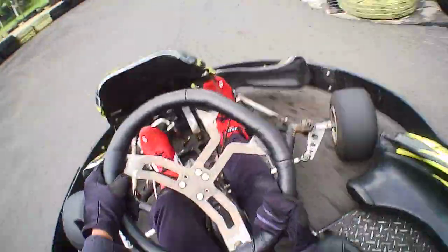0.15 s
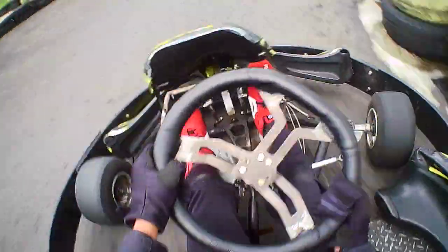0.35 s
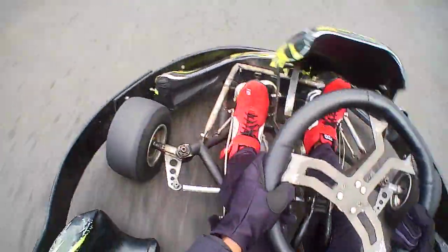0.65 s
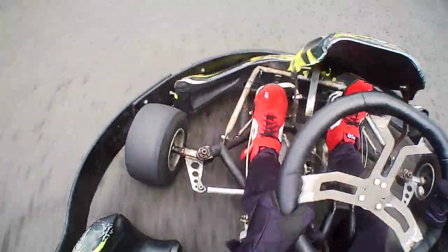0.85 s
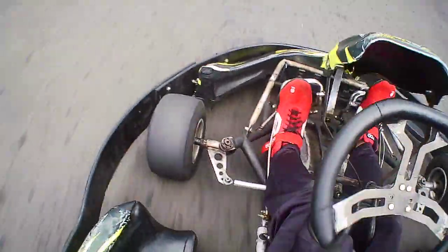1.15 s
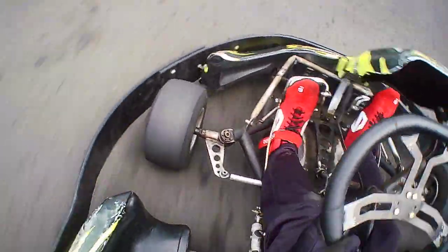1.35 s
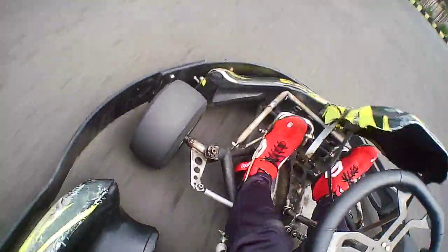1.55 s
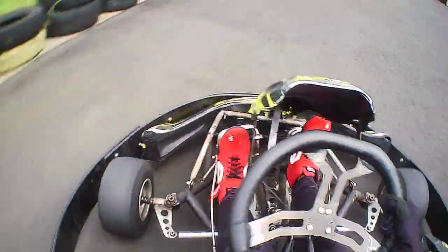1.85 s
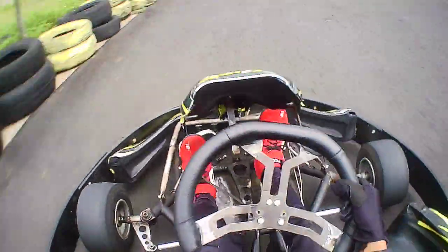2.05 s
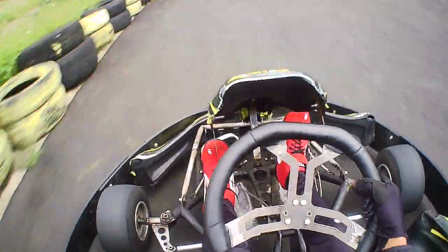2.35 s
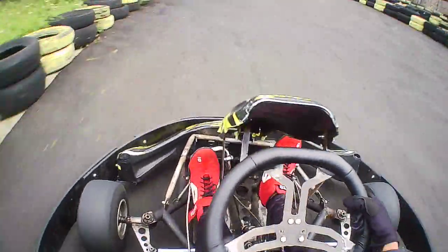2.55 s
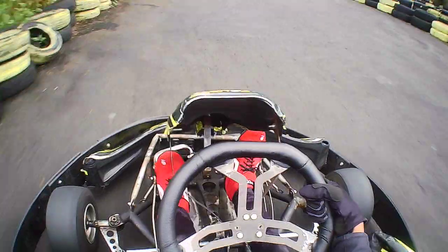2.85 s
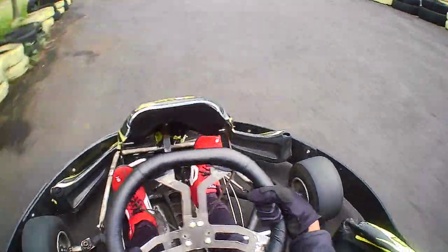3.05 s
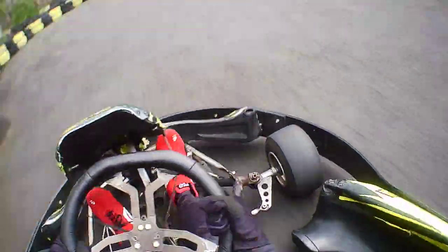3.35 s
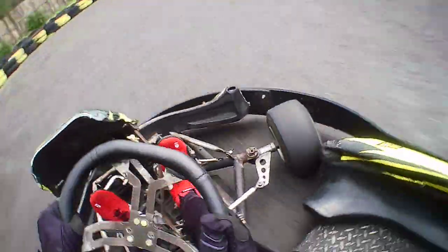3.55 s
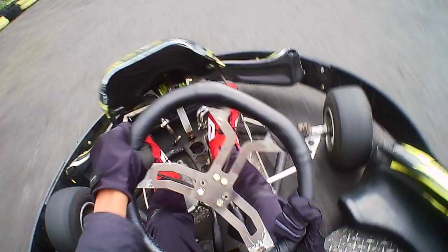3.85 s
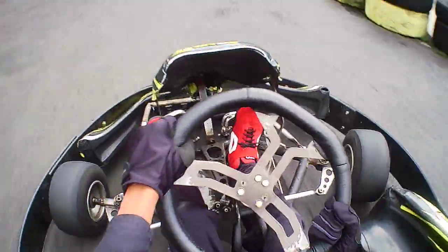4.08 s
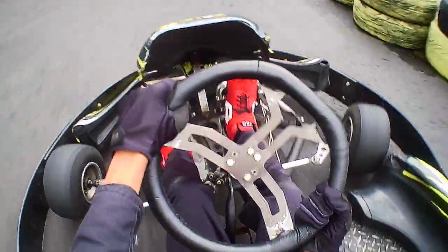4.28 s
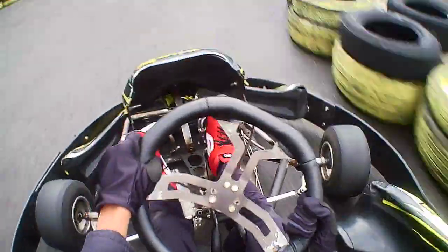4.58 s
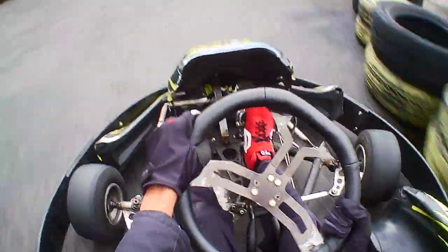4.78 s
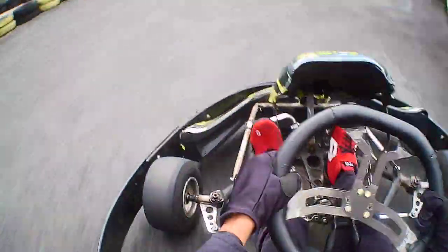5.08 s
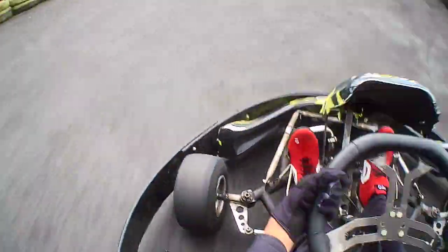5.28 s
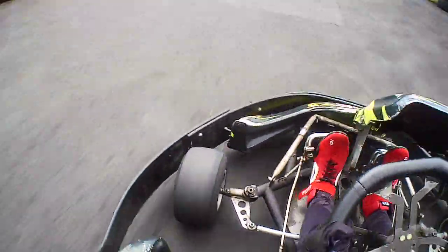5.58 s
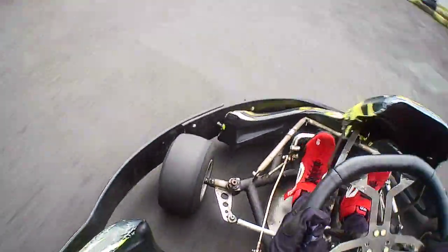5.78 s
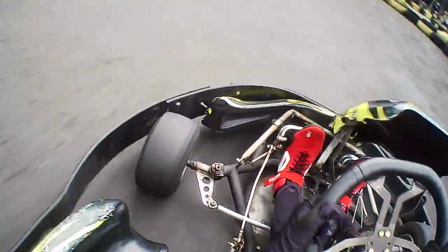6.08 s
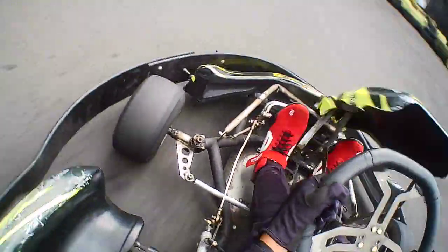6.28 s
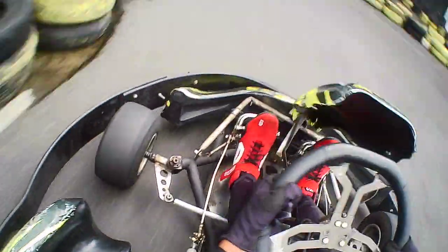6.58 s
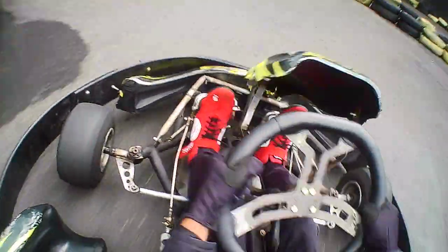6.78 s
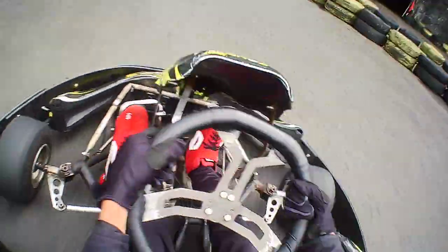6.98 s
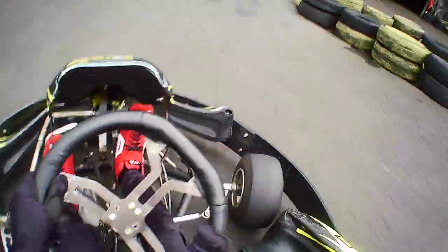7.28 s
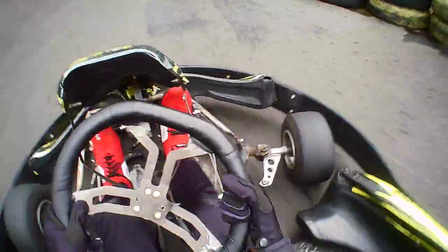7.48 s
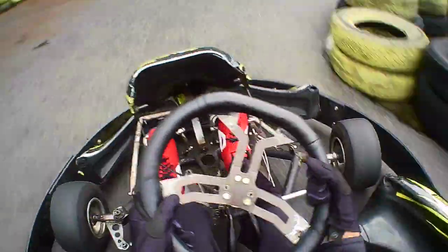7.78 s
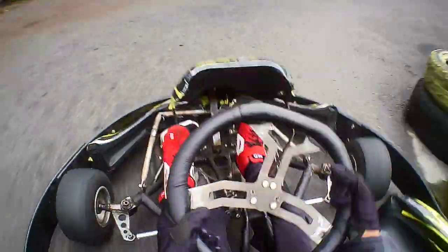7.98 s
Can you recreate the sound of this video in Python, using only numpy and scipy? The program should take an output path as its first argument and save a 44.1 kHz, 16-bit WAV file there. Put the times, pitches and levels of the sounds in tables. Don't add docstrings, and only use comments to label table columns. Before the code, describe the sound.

Heard from the driver's helmet on an outdoor track: rapid rough putter of a single-cylinder engine, knocking and rattling, easing and pulling again in small swells. Very deep irregular thumps and wobbling rumble dominate below, thickest around the middle and late on. Sharp dry ticks from something loose scatter throughout; the sound is muffled, boxy and overloaded, with dull treble.

```python
import sys
import numpy as np
from scipy import signal
from scipy.fft import rfft, irfft
from scipy.io import wavfile
from scipy.ndimage import uniform_filter1d

SR = 44100
rng = np.random.default_rng(int(sys.argv[2]) if len(sys.argv) > 2 else 0)


def file_out(sig):
    cols = np.atleast_2d(sig).T
    lim = np.clip(cols, -1, 1)
    pcm = np.round(lim * 32767).astype(np.int16)
    wavfile.write(sys.argv[1], SR, pcm)


def ratio(d):
    e = np.asarray(d, float) / 20
    return 10 ** e


N = 358533


def in_time(rows):
    s, *columns = np.transpose(rows)
    return [np.interp(np.arange(N) / SR, s, column) for column in columns]


def at_times(curve, s):
    return curve[(s * SR).astype(int)]


def rms_one(x):
    return x / np.sqrt(np.mean(x ** 2) + 1e-20)


def cut(x, hz, kind, order=2):
    return signal.sosfilt(signal.butter(order, hz, kind, fs=SR, output="sos"), x)


def clicks(seconds, heights):
    out = np.full(N, 1e-18)
    index = np.round(np.asarray(seconds) * SR).astype(int)
    np.add.at(out, np.minimum(index, N - 1), heights)
    return out


def ring(x, hz, t60):
    r, w = ratio(-60 / (t60 * SR)), 2 * np.pi * hz / SR
    return signal.lfilter([0, np.sin(w)], [1, -2 * r * np.cos(w), r * r], x)


def resonate(x, peaks):
    out = 0
    for k, (hz, width, db) in enumerate(peaks):
        r, w = np.exp(-np.pi * width / SR), 2 * np.pi * hz / SR
        b = (1 - r * r) / 2 * np.array([1, 0, -1])
        out = out + (-1) ** k * ratio(db) * signal.lfilter(b, [1, -2 * r * np.cos(w), r * r], x)
    return out


def evened(x):
    turn = .033 * SR
    power = uniform_filter1d(uniform_filter1d(x ** 2, size=int(turn)), size=int(turn / 2))
    return x * (power / power.mean() + 1e-6) ** (-.7 / 2)


def gritty_bursts(turns, bursts, shared, steady_db, uneven_db, jitter, grain_db):
    gate = ratio(steady_db)
    for position, rise, fall, db in bursts:
        number = np.floor(turns - position + .5).astype(int) + 1
        luck = .7 * shared + .7 * rng.standard_normal(shared.shape)
        lag = turns - position + 1 - number - jitter * luck[number, 0]
        shape = np.where(lag < 0, np.exp(-(lag / rise) ** 2), np.exp(-np.maximum(lag, 0) / fall))
        gate = gate + shape * ratio(db + uneven_db * luck[number, 1])
    grains = ratio(grain_db * np.minimum(rng.exponential(1, N), 6))
    return gate * grains * rng.standard_normal(N)


# time in seconds, speed in firings per second.
FIRING_RATE = [(0.0, 31.1), (0.66, 30.28), (1.09, 27.98), (1.61, 27.48), (2.0, 31.52), (2.22, 30.27),
               (2.98, 33.05), (3.16, 34.81), (3.67, 31.15), (4.56, 30.48), (4.68, 31.52), (5.39, 27.73),
               (5.7, 31.33), (6.18, 29.89), (6.4, 31.68), (7.0, 28.91), (7.47, 31.08), (8.13, 30.36)]


def crank():
    return .48 + np.cumsum(in_time(FIRING_RATE)[0]) / SR


def whole_turns(turns):
    return np.flatnonzero(np.diff(np.floor(np.maximum.accumulate(turns)))) / SR


# time in seconds, push in full scale, lag in axle turns.
AXLE_LIFT = [(0.0, 0.29, 0.46), (0.4, 0.52, 0.59), (1.0, 0.12, 0.84), (1.5, 0.39, 0.69), (1.9, 0.27, 0.64),
             (2.3, 0.18, 0.62), (2.7, 0.34, 0.72), (3.1, 0.19, 0.74), (3.6, 0.4, 0.7), (4.2, 0.28, 0.74),
             (4.8, 0.36, 0.66), (5.2, 0.12, 1.02), (5.6, 0.26, 0.51), (6.0, 0.27, 0.61), (6.5, 0.27, 0.71),
             (7.1, 0.39, 0.66), (7.6, 0.46, 0.74), (8.13, 0.15, 0.64)]


def axle_turns():
    push, lag = in_time(AXLE_LIFT)
    s = whole_turns(crank() / 3.016 - lag)
    return s, at_times(push, s)


# time in seconds, push in full scale (up is positive), share caught again on the
BUMPS = [(0.211, -0.75, -0.06, -0.47), (0.491, 0.39, -0.1, 0.07), (0.559, -0.19, -1.0, 0.17),
         (0.641, -0.23, -0.06, 0.1), (1.177, 0.16, -1.0, 0.31), (1.708, 0.58, 0.45, 0.24),
         (2.016, -0.48, 0.43, 0.51), (2.508, 0.51, 0.7, 0.66), (2.612, -0.19, 0.53, 0.48),
         (3.313, -0.56, 0.4, 0.34), (3.502, -1.1, 0.3, 0.24), (3.673, -1.35, 0.5, 0.74),
         (3.892, 0.45, 0.28, 0.01), (4.062, -0.95, 0.35, 0.68), (4.11, 0.36, 0.98, -0.16),
         (4.197, 0.9, 0.15, 0.49), (4.475, -0.19, 0.82, 0.32), (4.863, -0.86, 0.55, 0.04),
         (4.935, 0.48, -0.99, -0.75), (5.864, -0.55, 0.22, 0.42), (5.948, 0.13, 0.38, -0.39),
         (6.072, -0.59, 0.18, 0.37), (6.366, -0.56, 0.11, 0.46), (6.453, -0.89, 0.22, 0.42),
         (6.658, -0.8, 0.57, 0.49), (6.953, -0.55, 0.9, 0.52), (7.057, -0.55, 1.4, 0.58),
         (7.151, -0.48, 0.3, -0.41), (7.888, 0.39, 1.5, 0.65), (7.998, 0.67, 0.46, 0.76)]
# time in seconds, push in full scale.
SEAMS = [(1.261, -0.32), (1.817, 0.16), (2.155, 0.25), (2.886, 0.3), (3.17, 0.36), (4.14, -0.42),
         (4.255, 0.15), (4.91, -0.2), (4.958, -0.51), (5.193, 0.27), (5.688, 0.11), (6.271, 0.5),
         (6.787, 0.22), (7.016, 0.32), (7.133, 0.27), (7.497, 0.13)]


def jolts():
    rebound_s = .0218
    s, push, caught, _ = np.transpose(BUMPS)
    return np.vstack([np.c_[s, push], np.c_[s + rebound_s, -push * caught], SEAMS])


# time in seconds, load in dB, shade in dB.
LOAD = [(0, -0.5, 1.5), (.68, -2, 2.5), (1.1, -3, 0.5), (1.4, -4.5, -1), (1.9, -2, 1.5), (3.11, -0.5, 2.5),
        (3.22, -2, 2.5), (3.62, -4, 1.5), (3.92, -10.5, 0.5), (3.96, 0.5, 1), (4.3, -1.5, 2.5),
        (4.8, 0.5, 2), (5.37, -3, -0.5), (5.82, -1.5, -0.5), (6.0, -8.5, -0.5), (6.3, -0.5, -0.5),
        (6.97, -3.5, 1), (7.4, -0.5, 3)]
# frequency in Hz, density in dB per Hz.
ROAD_COLOUR = [(45, -50), (70, -34.5), (110, -21), (180, -21.5), (300, -20.5), (700, -34.5), (1000, -23.5),
               (2500, -42)]


def road():
    hz = np.maximum(np.fft.rfftfreq(N, 1 / SR), 1)
    colour_hz, colour_db = np.transpose(ROAD_COLOUR)
    colour = ratio(np.interp(np.log(hz), np.log(colour_hz), colour_db))
    lumps = rms_one(cut(rng.standard_normal(N), 18.2, "low"))
    noise = irfft(rfft(rng.standard_normal(N) * ratio(3.08 * lumps)) * colour, N)
    noise = cut(noise, 5500, "low")
    s, push = jolts().T
    shaken = signal.lfilter([1], [1, -np.exp(-1 / (.08 * SR))], clicks(s, np.abs(push)))
    level_db = -37.5 + .35 * in_time(LOAD)[0] + 3 * shaken
    return ratio(level_db) * rms_one(noise)


def thuds():
    s, push = jolts().T
    shake = signal.lfilter([1], [1, -ratio(-60 / (.12 * SR))], clicks(s, np.abs(push) ** 3))
    rumble = cut(cut(rng.standard_normal(N), 70, "high"), 170, "low", order=4)
    return ratio(-24) * cut(shake, 60, "low") * rms_one(rumble)


def mount(pushes, hz, t60, soft_hz):
    return cut(ring(clicks(*np.transpose(pushes)), hz, t60), soft_hz, "low")


# time in seconds, push in full scale, heave in full
LESSER_PUSHES = [(0.031, -0.08, -0.26), (0.222, -0.25, 0.09), (0.324, -0.12, -0.29), (0.67, 0.02, 0.21),
                 (0.751, -0.05, 0.18), (0.937, -0.06, 0.31), (1.033, -0.09, 0.26), (1.411, 0.1, 0.16),
                 (1.905, 0.05, 0.17), (1.984, -0.09, -0.2), (2.098, 0.11, -0.24), (2.145, 0.01, 0.26),
                 (2.512, 0.02, -0.26), (2.543, -0.21, 0.06), (2.586, 0.07, -0.29), (2.699, -0.22, -0.06),
                 (2.941, -0.06, -0.19), (3.016, 0.13, 0.22), (3.16, 0.04, 0.29), (3.215, 0.06, 0.19),
                 (3.379, 0.21, 0.14), (3.471, -0.01, -0.32), (3.59, 0.11, -0.18), (3.661, -0.17, -0.27),
                 (3.761, -0.14, 0.11), (3.865, -0.02, 0.34), (3.942, 0.06, 0.23), (4.227, -0.22, 0.15),
                 (4.257, 0.01, -0.19), (4.354, 0.01, 0.23), (4.444, -0.01, -0.35), (4.556, -0.07, -0.35),
                 (4.683, -0.07, -0.21), (4.747, 0.05, 0.22), (4.803, 0.06, -0.21), (4.898, 0.11, 0.39),
                 (4.928, 0.09, 0.16), (5.182, 0.06, 0.29), (5.266, -0.09, -0.23), (5.408, -0.1, -0.22),
                 (5.585, 0.14, -0.09), (5.686, -0.02, 0.23), (5.746, -0.09, -0.18), (6.045, 0.03, -0.2),
                 (6.183, -0.04, 0.18), (6.253, -0.14, 0.34), (6.283, 0.22, -0.05), (6.409, -0.08, 0.16),
                 (6.499, -0.21, 0.13), (6.631, -0.04, -0.27), (6.704, -0.27, 0.26), (6.845, -0.12, 0.3),
                 (7.048, -0.12, -0.27), (7.18, 0.18, 0.01), (7.368, -0.19, 0.04), (7.567, -0.14, 0.13),
                 (7.687, -0.23, -0.16), (7.842, -0.08, -0.21), (7.906, 0.11, 0.14), (7.981, -0.18, -0.26)]
# time in seconds, push in full scale.
LIGHT_PUSHES = [(0.006, -0.21), (0.073, -0.13), (0.164, -0.12), (0.195, 0.26), (0.22, -0.12), (0.383, 0.09),
                (0.866, -0.1), (1.339, 0.16), (1.599, 0.13), (1.686, -0.11), (1.743, -0.13), (2.041, -0.14),
                (2.619, 0.13), (2.679, 0.12), (2.786, 0.1), (2.897, 0.15), (2.93, 0.11), (2.98, -0.14),
                (3.301, -0.12), (3.337, -0.19), (3.413, 0.11), (3.528, 0.16), (3.545, 0.24), (3.574, -0.18),
                (3.685, -0.45), (3.721, -0.14), (3.802, 0.09), (3.892, -0.15), (3.926, -0.13), (4.049, -0.19),
                (4.094, 0.11), (4.185, -0.23), (4.378, 0.11), (4.501, -0.12), (4.892, 0.15), (4.919, -0.11),
                (5.089, 0.13), (5.854, -0.17), (5.89, -0.16), (6.279, 0.11), (6.329, -0.16), (6.47, 0.1),
                (6.534, 0.12), (6.577, 0.11), (6.69, 0.12), (6.803, 0.11), (6.864, 0.14), (6.941, -0.18),
                (6.975, -0.12), (7.057, -0.14), (7.079, 0.14), (7.12, 0.12), (7.358, -0.13), (7.384, 0.16),
                (7.539, 0.09), (7.653, -0.09), (7.916, -0.15), (7.953, -0.15), (8.001, 0.23), (8.026, -0.18)]


def shaking():
    ring_hz, ring_t60 = 42, .3
    s = np.arange(N) / SR
    left_over = -.25 * np.cos(2 * np.pi * ring_hz * s) * ratio(-60 * s / ring_t60)
    wallow = ratio(-33) * rms_one(cut(rng.standard_normal(N), 42, "low", order=4))
    turned, lift = axle_turns()
    bumps, lesser = np.array(BUMPS), np.array(LESSER_PUSHES)
    heaves = np.vstack([np.c_[turned, lift], bumps[:, [0, 3]], lesser[:, [0, 2]]])
    kicks = lift * (.2 + .02 * rng.standard_normal(len(lift)))
    rings = np.vstack([jolts(), np.c_[turned + .012, kicks], lesser[:, :2], LIGHT_PUSHES])
    swing = mount(heaves, 10, .4, 40) + mount(rings, ring_hz, ring_t60, 70) + left_over + wallow
    return swing + .6 * np.maximum(swing, 0) ** 3


# time in seconds, peak in dB.
TICKS = [(0.0757, -27.5), (0.7233, -26), (1.182, -15.5), (1.3545, -25), (1.569, -20), (1.6157, -34),
         (1.706, -19.5), (1.7886, -23.5), (1.8253, -38), (2.008, -22), (2.4665, -25), (2.509, -25),
         (2.604, -13), (2.8838, -22), (3.1193, -28.5), (3.3214, -12.5), (3.4386, -23.5), (3.6734, -23.5),
         (3.708, -42.5), (3.7815, -23.5), (4.0524, -21), (4.1704, -18), (4.2125, -20), (4.344, -22.5),
         (4.4104, -34), (4.8904, -23.5), (4.9556, -17.5), (5.0629, -24), (5.23, -27), (5.272, -20.5),
         (5.3978, -26), (5.6181, -31), (6.0595, -25), (6.123, -30), (6.354, -24), (6.4504, -20),
         (6.568, -23), (6.659, -12.5), (6.8564, -18), (7.0665, -22.5), (7.0928, -34), (7.1274, -27),
         (7.1852, -19.5), (7.2709, -18), (7.7532, -23.5), (7.8565, -24), (7.9023, -27), (7.966, -23),
         (0.0094, -27), (0.1138, -25), (0.5607, -24.5), (0.931, -28.5), (1.255, -25.5), (1.681, -26),
               (1.8966, -23), (2.1215, -27), (2.5427, -25.5), (2.5977, -27.5), (4.23, -27), (4.574, -29.5),
               (4.8417, -24), (6.6485, -25), (6.8446, -26.5), (6.928, -28), (7.0942, -29), (7.2824, -33.5)]
# frequency in Hz, level in dB, t60 in seconds.
TICK_MODES = [(3450, 5, 0.0065), (3637, -0.5, 0.0087), (3940, 0, 0.013), (4254, -2, 0.017)]
# frequency in Hz, level in dB, t60 in seconds.
TICK_BRIGHT = [(5300, 9.5, 0.003), (6570, -8, 0.017), (8500, -9.5, 0.033)]
# delay in seconds, level in dB.
BOUNCES = [
    (0.0, 0.5),
    (.0034, -1),
    (.0068, -6.5),
    (.011, -27),
]


def loose_part():
    turned = axle_turns()[0]
    chance = rng.standard_normal((len(turned), 2)).clip(-2, 2)
    faint_s = np.abs(turned + .015 * chance[:, 0])
    faint_db = -40 + at_times(in_time(LOAD)[1], turned) + 3 * chance[:, 1]
    s, peak_db = np.vstack([TICKS, np.c_[faint_s, faint_db]]).T
    bright_db = -13 + 2 * rng.standard_normal(len(s))
    out = 0
    for modes, share_db in ((TICK_MODES, -7), (TICK_BRIGHT, bright_db)):
        for hz, db, t60 in modes:
            luck = rng.standard_normal((len(s), len(BOUNCES), 2))
            blows = 0
            for k, (lag, bounce_db) in enumerate(BOUNCES):
                hit_s = s + lag + .00026 * np.abs(luck[:, k, 0])
                hit_db = peak_db + share_db + db + bounce_db + 2 * luck[:, k, 1]
                blows = blows + clicks(hit_s, ratio(hit_db))
            out = out + ring(blows, hz, t60)
    return out


# frequency in Hz, width in Hz, level in dB.
INTAKE = [(650, 350, -3.5), (1073, 160, -2.5)]
# crank position in turns, rise in turns, fall in turns, level in dB.
INTAKE_BURSTS = [
    (.73, .04, .05, 0),
    (.03, .04, .06, -8),
]


def intake():
    turns = crank()
    unshared = np.zeros((int(turns[-1]) + 3, 2))
    gulps = gritty_bursts(turns, INTAKE_BURSTS, unshared, steady_db=-12, uneven_db=1.5, jitter=.02, grain_db=1)
    rush = resonate(resonate(gulps, INTAKE), INTAKE)
    level_db = -42 + 2 * (in_time(FIRING_RATE)[0] - 30.63) + .78 * in_time(LOAD)[0]
    return ratio(level_db) * rms_one(rush)


# crank position in turns, level in dB.
VALVE = [
    (.65, 0),
    (.94, -3),
]


def valve(turns):
    luck = rng.standard_normal((int(turns[-1]) + 3, 2))
    out = 0
    for position, db in VALVE:
        s = whole_turns(turns - position)
        mine = luck[np.floor(at_times(turns, s)).astype(int)]
        wander_s = .025 * mine[:, 0] / 30
        out = out + clicks(np.abs(s + wander_s), ratio(db + mine[:, 1]))
    return out


def with_speed(x, peaks):
    clock = np.cumsum((in_time(FIRING_RATE)[0] / 30.8) ** .9)
    even = np.arange(int(clock[-1]) + 1)
    return np.interp(clock, even, resonate(np.interp(even, clock, x), peaks))


# crank position in turns, rise in turns, fall in turns, level in dB.
PIPE_BURSTS = [
    (0.67, 0.035, 0.12, -2.5),
    (0.94, 0.035, 0.06, -7),
    (0.25, 0.3, 0.3, -13),
]


def exhaust_puffs(turns, shared):
    return rms_one(gritty_bursts(turns, PIPE_BURSTS, shared, steady_db=-14, uneven_db=1,
                                 jitter=.015, grain_db=1.5))


# frequency in Hz, width in Hz, level in dB.
PIPE = [(334, 45, -4), (431.7, 42, 4), (530.4, 58, 5), (616.3, 98, 1.5)]
# frequency in Hz, width in Hz, level in dB.
SILENCER = [(422, 38, -2.5), (537, 52, 1.5), (608, 85, -2)]


def exhaust(puffs, turns, shared, load_db):
    in_pipe = puffs + ratio(3) * rms_one(valve(turns))
    chambers = exhaust_puffs(turns, shared)
    pipe = with_speed(in_pipe, PIPE) + resonate(chambers, SILENCER)
    pipe = cut(cut(pipe, 360, "high", order=5), 650, "low", order=5)
    return ratio(-33 + .52 * load_db) * rms_one(pipe)


# frequency in Hz, width in Hz, level in dB.
BLOCK = [(790, 350, -16), (970, 640, -21), (1206, 58, .5), (1353, 126, -4), (1422, 175, -5.5),
         (1896, 172, -11), (2120, 220, -16)]
# time in seconds, main ring in dB, highest clatter in dB.
FACING = [(0, 1, 3.5), (.8, 0.5, -2.5), (1.05, -2, 2.5), (1.4, -1, 8), (2.2, 2, 0.5), (2.6, -3.5, -4),
          (3.15, 3.5, 3), (3.3, -3, 3), (3.7, -1.5, 8), (3.95, 0, 3.5), (4.8, 1.5, 1.5), (5.0, -3.5, -2),
          (5.4, -1, -0.5), (6.0, -3.5, 0), (6.8, 1, 0.5), (7.5, -0.5, 1), (7.75, -2, -2), (8.13, 0, -4)]


def block(knock, load_db):
    main_ring = ratio(in_time(FACING)[0]) * evened(resonate(knock, BLOCK[2:3]))
    below = evened(resonate(knock, BLOCK[:2]))
    above = evened(resonate(knock, BLOCK[3:5])) + evened(resonate(knock, BLOCK[5:]))
    body = cut(cut(main_ring + below - above, 690, "high"), 3000, "low")
    return ratio(-27.5 + load_db) * rms_one(body)


# frequency in Hz, width in
# Hz, level in dB.
SHELL = [(2780, 200, -2), (3550, 500, -5), (4220, 150, 0), (4800, 350, -7), (5450, 300, -6),
         (5850, 300, -8), (6850, 450, -9), (7500, 500, -16), (7980, 80, -8)]


def shell(clatter, shell_db, shade_db):
    bright = cut(cut(evened(resonate(clatter, SHELL)), 1100, "high"), 7600, "low")
    lower = signal.sosfiltfilt(signal.butter(2, 6000, fs=SR, output="sos"), bright)
    top_db = -5 + in_time(FACING)[1] + 3.5 * shade_db
    bright = lower + ratio(top_db) * (bright - lower)
    return ratio(shell_db) * rms_one(bright)


# multiple of the firing rate, level in dB rms.
ORDERS = [(1, -38), (2, -43), (3, -47), (4, -49), (5, -56), (6, -56)]
# crank position in turns, rise in turns, fall in turns, level in dB.
BLOCK_BURSTS = [
    (.82, .04, .1, -1),
    (.07, .04, .05, -13),
    (.6, .05, .08, -9),
]
# crank position in turns, rise in turns, fall in turns, level in dB.
SHELL_BURSTS = [
    (.87, .03, .07, 5.5),
    (.65, .04, .05, -5),
    (.11, .05, .15, -4),
]


def engine():
    turns = crank()
    load_db, shade_db = in_time(LOAD)
    shell_db = -43 + .72 * load_db + shade_db
    hiss_db = -4.5 + .6 * (shell_db - np.median(shell_db))
    shared = rng.standard_normal((int(turns[-1]) + 3, 2))
    puffs = exhaust_puffs(turns, shared)
    knock = gritty_bursts(turns, BLOCK_BURSTS, shared, steady_db=-10.5 + .4 * load_db, uneven_db=1,
                          jitter=.02, grain_db=1)
    clatter = gritty_bursts(turns, SHELL_BURSTS, shared, steady_db=hiss_db, uneven_db=2.5,
                            jitter=.03, grain_db=2.6)
    hum = 0
    for order, db in ORDERS:
        hum = hum + np.sqrt(2) * ratio(db) * np.cos(2 * np.pi * order * (turns - .85))
    return (exhaust(puffs, turns, shared, load_db) + block(knock, load_db)
            + shell(clatter, shell_db, shade_db) + hum)


# time in seconds, peak in dB, share of the upper modes in
# dB.
KNOCKS = [(0.0742, -9, -12), (0.173, -18, -19), (0.3686, -12, -19), (0.5338, -17.5, -17), (1.04, -20, -2),
          (1.1822, -2.5, -8.5), (1.4743, -14, -11.5), (1.6165, -17, -9), (1.6534, -10, -22),
          (1.6869, -11, -8), (1.7557, -18, -17), (1.7913, -4.5, -20), (1.8257, -9, -22.5),
          (1.891, -11, -14), (1.9265, -12, -16), (2.0238, -9.5, -25), (2.0477, -20, -18),
          (2.1515, -3.5, -20), (2.2458, -11, -14), (2.2827, -12, -16), (2.3138, -8, -16), (2.3461, -25, 7),
          (2.5076, -15, -9), (2.601, -5.5, -20), (2.852, -9.5, -15), (2.884, -11, -9), (3.0312, -15, -15),
          (3.0654, -4, -28), (3.7085, -20.5, -4.5), (3.9824, -12, -34), (4.0547, -8, -25),
          (4.1041, -3, -31), (4.2158, -22, -8), (4.5102, -8, -32), (4.803, -10, -28), (4.9222, -6, -10),
          (5.0305, -9.5, -16), (5.1687, -14, -7), (5.2353, -16.5, -1), (5.3086, -13, -11),
          (5.3413, -17.5, -5), (5.449, -8.5, -15), (5.5558, -14, -11.5), (5.7503, -9.5, -18),
          (5.8643, -7.5, -9.5), (6.8605, -11.5, -17), (6.997, -7.5, -23), (7.0625, -6, -15),
          (7.1023, -11.5, -17), (7.1363, -10.5, -25), (7.1709, -9, -19), (7.2286, -11.5, -17),
          (7.3327, -8.5, -31), (7.5918, -28, -19), (7.657, -8.5, -28), (7.6909, -14, -24),
          (7.834, -8, -11.5), (7.8862, -13, -16), (7.9195, -5, -16), (8.0158, -8.5, -16),
          (0.0094, -9, -7.5), (0.4987, -12.5, -13.5), (0.9328, -15, -13), (1.5073, -28, -14),
                  (1.544, -19.5, -1), (1.9891, -16.5, -6), (2.185, -29, -14), (2.412, -15, -12),
                  (2.4453, -12.5, -10), (2.5376, -9, -18), (2.666, -13, -14), (2.79, -8, -16),
                  (2.8208, -17, -8), (3.12, -11.5, -13), (3.3778, -11, -9), (3.5436, -15.5, -4.5),
                  (3.9475, -13, -13), (4.1812, -13.5, -8), (4.4085, -17, -9), (4.4438, -19, -5),
                  (4.541, -15, -23), (4.6367, -17, -16), (4.6698, -11, -11), (4.7022, -12, -14),
                  (5.2708, -12, -10), (5.3787, -18, 0.5), (5.4163, -21, -7), (5.4865, -15.5, -5),
                  (5.62, -7.5, -16.5), (5.6856, -18, -11), (5.909, -13, -8.5), (6.304, -26, -15),
                  (6.6295, -10, -8), (6.9608, -12, -7), (7.4686, -15, -8)]


def hard_knocks():
    fired = whole_turns(crank() - .83)
    listed = np.array(KNOCKS)
    chance = rng.standard_normal((len(fired), 2)).clip(-2, 2)
    soft_db = -20 + at_times(in_time(LOAD)[0], fired) + 1.2 * chance[:, 0]
    soft = np.c_[fired, soft_db, -12 + 3 * chance[:, 1]]
    soft = soft[np.abs(fired[:, None] - listed[:, 0]).min(axis=1) > .012]
    s, peak_db, upper_db = np.vstack([listed, soft]).T
    luck = rng.standard_normal((len(s), len(BLOCK), 3, 2))
    out = 0
    for k, (hz, width, db) in enumerate(BLOCK):
        share_db = upper_db + 18.0 if hz > 1700 else 0
        lags = [-.0012, 0, .003] + .0005 * luck[:, k, :, 0]
        sizes_db = (peak_db + db + share_db)[:, None] + [-9, -6, -7] + 1.6 * luck[:, k, :, 1]
        blows = clicks((s[:, None] + lags).ravel(), ratio(sizes_db).ravel())
        out = out + ring(blows, hz, 1.8 / width)
    return cut(cut(out, 1200, "high"), 2600, "low")


# frequency in Hz, width in Hz, depth in dB.
NULLS = [(690, 120, 6), (1750, 150, 6), (2980, 220, 8), (4100, 90, 6), (5170, 160, 7), (6250, 450, 7)]


def housing(x):
    for hz, width, depth_db in NULLS:
        pole, zero = np.exp(-np.pi * width / SR * np.array([1, ratio(-depth_db)]))
        turn = -2 * np.cos(2 * np.pi * hz / SR)
        x = signal.lfilter([1, turn * zero, zero ** 2], [1, turn * pole, pole ** 2], x)
    return x


def scene():
    airborne = engine() + hard_knocks() + loose_part() + road() + thuds() + intake()
    return (housing(airborne) + shaking())[None]


def roll_off(x):
    return signal.sosfilt(signal.butter(12, 9000, fs=SR, output="sos"), x)


def record(dry):
    ceiling, bottom = .714, -.69
    x = np.clip(cut(dry, 3, "high", order=1) + .009, bottom, ceiling + .004)
    start = x[:, :1]
    x = start + signal.sosfilt(signal.cheby2(10, 55, 9200, fs=SR, output="sos"), x - start)
    return roll_off(np.minimum(x, ceiling))


dry = scene()
out = record(dry)
file_out(out)
```